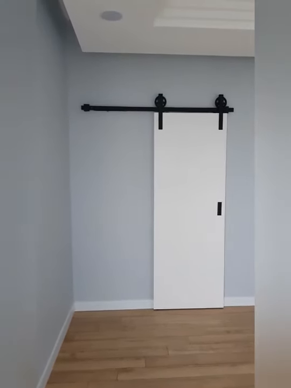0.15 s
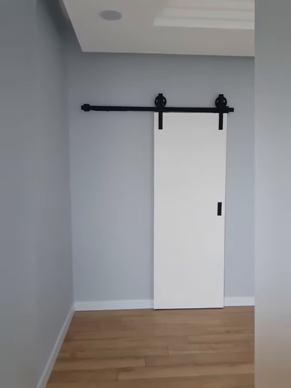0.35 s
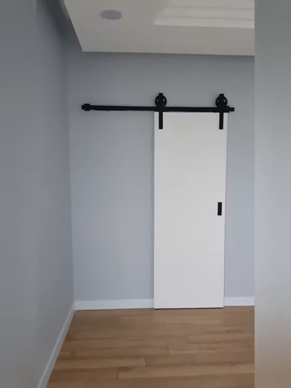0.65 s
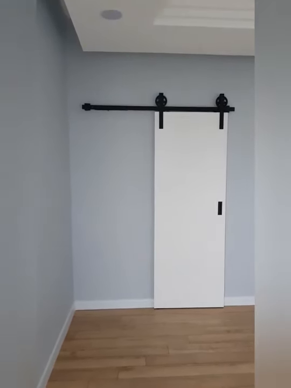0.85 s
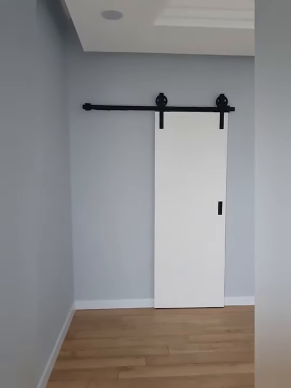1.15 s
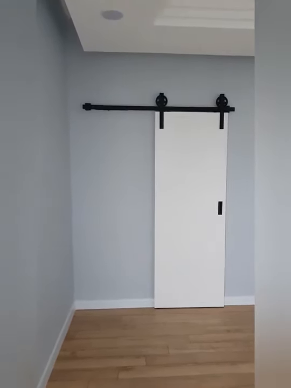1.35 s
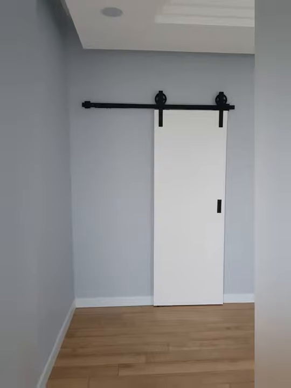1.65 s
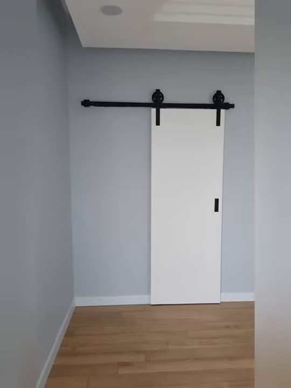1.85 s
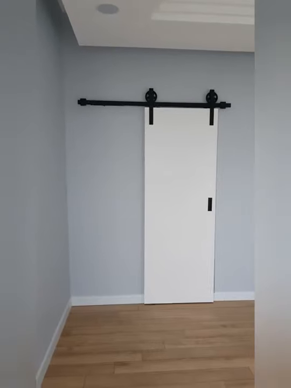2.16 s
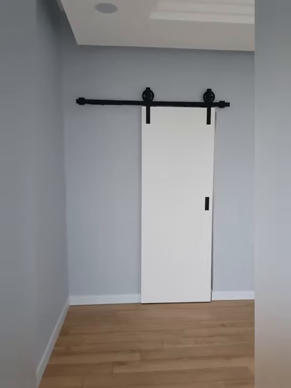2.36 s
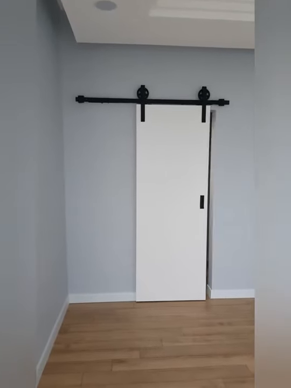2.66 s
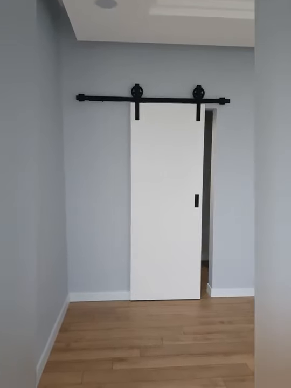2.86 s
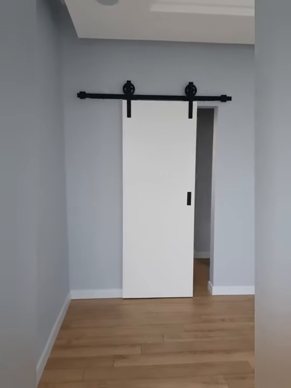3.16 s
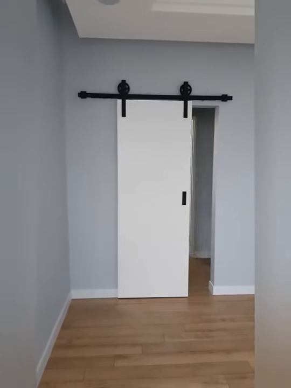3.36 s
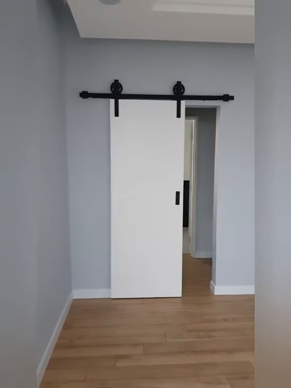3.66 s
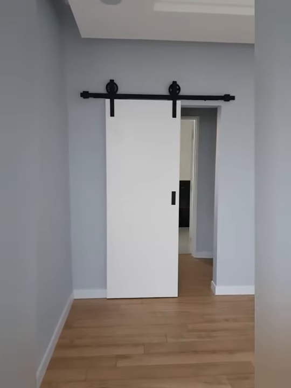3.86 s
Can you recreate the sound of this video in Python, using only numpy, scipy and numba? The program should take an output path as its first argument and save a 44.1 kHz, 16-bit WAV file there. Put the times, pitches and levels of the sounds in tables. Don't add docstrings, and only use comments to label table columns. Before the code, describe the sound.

A light sliding door rumbles along its overhead rail, starting with a heavy jolt in a bare room.

```python
import sys
import numpy as np
from scipy import signal
from scipy.fft import rfft, irfft
from scipy.io import wavfile
from scipy.ndimage import uniform_filter1d
from numba import njit

SR = 44100
rng = np.random.default_rng(int(sys.argv[2]) if len(sys.argv) > 2 else 0)


def volts_from_decibels(level):
    exponent = np.asarray(level, float) / 20
    return 10 ** exponent


def wav_record(signal):
    frames = np.transpose(np.atleast_2d(signal))
    bounded = np.clip(frames, -1, 1)
    quanta = np.round(bounded * 32767).astype(np.int16)
    wavfile.write(sys.argv[1], SR, quanta)


N = 176400
T = np.arange(N) / SR

# pitch_hz, width_hz, rolling_db, rest_db
MODES = [(51.2, 6.3, -2, 2), (74, 18, -8.5, -2), (90.9, 11.2, -0.5, -5.5), (131.7, 2.9, -8, -7.5),
         (150.7, 16.4, -1.5, -7.5), (176, 32, -12, -9), (219.7, 9.2, -3.5, -10.5), (255.3, 25.5, -10, -4.5),
         (291, 5, -16.5, -8), (319.4, 11, -15, -15.5), (367.4, 42, -12, -10), (405.2, 20, -22, -13.5),
         (492, 39, -14, -15), (743.8, 7.5, -37, -20)]
# time_s, load_db
ROLL_LOAD = [(1.7, -82.5), (1.725, -23), (1.78, -22.5), (1.85, -26), (1.92, -28), (2.05, -27.5),
             (2.25, -36), (2.42, -37), (2.49, -45), (2.53, -48), (2.63, -39), (2.72, -32.5), (2.97, -39),
             (3.08, -33), (3.17, -36.5), (3.3, -31), (3.85, -35), (4.0, -35.5)]
# start_s, level_db, softness_hz (lower is softer)
RAIL_JOLTS = [(0.039, -33.5, 120), (0.967, -34, 118.5), (1.72, -22.5, 600), (1.822, -24, 120),
              (1.847, -25.5, 121), (1.919, -23, 205), (1.958, -31, 122), (2.019, -27.5, 346),
              (2.09, -22, 197), (2.198, -33, 146), (2.32, -33, 198), (2.507, -30.5, 196.4),
              (2.77, -40, 150.8), (2.946, -33, 91), (3.059, -37, 256), (3.151, -30, 95), (3.341, -45, 247),
              (3.451, -52, 194), (3.782, -31, 78), (3.86, -41, 90)]
# start_s, length_s, peak_db, pitch_hz
CHATTERS = [(0.01, 0.077, -35, 52), (0.448, 0.18, -42, 50), (0.938, 0.13, -38.5, 47),
            (1.726, 0.19, -22.5, 52), (1.744, 0.07, -29.5, 148), (1.749, 0.071, -31, 211),
            (1.76, 0.12, -37, 316), (1.808, 0.073, -23.5, 137), (1.893, 0.061, -26.5, 128),
            (1.912, 0.077, -31, 61), (1.957, 0.13, -35.5, 223), (1.99, 0.11, -45, 367),
            (2.004, 0.057, -21.5, 146), (2.056, 0.13, -29, 73), (2.066, 0.12, -26.5, 133),
            (2.167, 0.08, -27.5, 77), (2.188, 0.058, -29, 139), (2.215, 0.1, -27, 51),
            (2.282, 0.19, -34.5, 139), (2.31, 0.1, -34, 68), (2.71, 0.14, -48, 220), (2.735, 0.2, -35, 55),
            (2.836, 0.11, -39.5, 144), (2.914, 0.086, -29.5, 53), (2.97, 0.12, -34.5, 226),
            (3.044, 0.071, -33.5, 88), (3.103, 0.11, -39, 145), (3.127, 0.086, -31.5, 51),
            (3.158, 0.05, -45, 372), (3.17, 0.16, -37, 222), (3.327, 0.075, -32, 142),
            (3.38, 0.22, -39, 139), (3.456, 0.072, -39, 58), (3.48, 0.15, -40.5, 247),
            (3.613, 0.22, -37, 141), (3.74, 0.23, -31.5, 50), (3.88, 0.092, -38.5, 143)]
# start_s, length_s, level_db, centre_hz, brightness_db
SLIDES = [(0.224, 0.32, -74, 2500, 5), (0.84, 0.075, -76, 4000, 3), (1.22, 0.11, -52, 855, -18),
          (1.298, 0.093, -53, 2000, -14), (1.225, 0.19, -50.5, 1550, -11), (1.522, 0.12, -52, 1130, -6.5),
          (1.66, 0.11, -48, 724, -8.5), (1.84, 0.31, -56.5, 1230, -6.5), (2.294, 0.62, -76, 2820, 4.5),
          (2.18, 0.47, -67, 1260, -5), (2.57, .08, -60, 1470, -2.5), (2.8, 0.27, -56.5, 1370, -6),
          (3.178, 0.06, -73.5, 2500, 6), (3.245, 0.044, -79, 4000, 6), (3.414, 0.045, -51, 640, -14),
          (3.56, 0.063, -55, 1215, -12), (3.646, 0.11, -46, 950, -6.5), (3.797, 0.3, -53, 1220, -5)]
# start_s, length_s, level_db, centre_hz, brightness_db
SKIDS = [
    (0.988, 0.095, -59, 2400, 4),
    (2.641, 0.05, -47.5, 1790, -7.5),
    (3.363, 0.11, -42, 810, -9.5),
]
# start_s, length_s, level_db
FABRIC_BRUSHES = [(1.0, 0.095, -69.5), (1.27, 0.15, -66.5), (0.876, .1, -80), (1.74, 0.33, -75),
                  (2.082, 0.42, -80.5), (2.552, .08, -77), (2.642, 0.094, -67.5), (2.86, .2, -72.5),
                  (3.37, 0.16, -71.5), (3.75, 0.13, -69.5)]
# freq_hz, density_db (per Hz)
FABRIC_TONE = [(6500, 0), (8500, -7.5), (10800, -3.5), (13000, -9), (15500, -9.5)]
# freq_hz, density_db (per Hz)
SCUFF_EDGE = [(1500, 1.5), (2800, 4.5), (4200, 1), (6800, -8), (8400, -22), (15500, -25)]
# pitch_hz, width_hz, level_db
FLOORBOARDS = [(612, 130, -7), (715, 22, 3), (897, 33, -6.5), (1260, 49, -4), (1717, 28, -11),
               (1990, 22, -10.5), (2480, 34, -11)]
# freq_hz, density_db (per Hz)
HISS_TONE = [(330, -12.5), (800, -3.5), (2300, -16.5), (3300, -31.5), (6800, -34.5), (8300, -48.5),
             (12000, -35.5), (15700, -38)]
# freq_hz, side_minus_mid_db
STEREO_WIDTH = [(30, -48), (60, -18), (125, -17), (250, -16), (420, -5.5), (650, -3), (1000, 1),
                (2000, 0.5)]
# freq_hz, left_minus_right_db
STEREO_LEAN = [(125, 0), (250, -2), (500, 0), (1000, -3), (3000, -3.5), (6000, -3), (9000, .5)]
# freq_hz, gain_db
MIC_PORT = [(2700, -0.5), (3400, -3.5), (4300, -0.5), (7200, -0.5), (8300, -1.5), (9800, 1)]

BUMPS_PER_S, BUMP_SCATTER_DB = 270, 1.5
DULL_PER_DB = 0.0636
CONTACT_HZ = 440
CHATTER_WOBBLE, CHATTER_DB = 0.0203, -1
SCUFF_ATTACK_S, ATTACK_SHARE, SCUFF_RELEASE_S = 0.041, 0.46, 0.15
SKID_ATTACK_S = 0.048
GRIT_PER_S, GRIT_SCATTER_DB = 3000, 2
SQUEAK_S, SQUEAK_LEN_S, SQUEAK_DB = 2.945, 0.086, -70
SQUEAK_HZ, SQUEAK_RISE_HZ, SQUEAK_WIDTH_HZ = 10750, 600, 1300
TICK_S, TICK_DB, TICK_HZ = 3.246, -58, 5500
HUM_DB, HISS_DB = -41.5, -54
ROOM_T60_S, ROOM_DB = 0.53, -5.5
BASS_T60_S, BASS_SIDE_T60_S, BASS_WET_DB = 0.73, 0.26, -10.5


def level(x, db):
    return x * volts_from_decibels(db) / np.sqrt(np.mean(x ** 2))


def colour(x, table):
    hz, db = np.array(table, float).T
    freq = np.fft.rfftfreq(x.shape[-1], 1 / SR)
    gain = volts_from_decibels(np.interp(np.log(freq + 1), np.log(hz), db))
    return irfft(rfft(x) * gain, x.shape[-1])


@njit
def gliding_band(x, hz, width):
    y, b, l = np.empty(len(x)), 0., 0.
    for i in range(len(x)):
        g, k = np.tan(np.pi * hz[i] / SR), width / hz[i]
        v = (b + g * (x[i] - l)) / (1 + g * (g + k))
        b, l, y[i] = 2 * v - b, l + 2 * g * v, k * v
    return y


def band(x, hz, width):
    return signal.lfilter(*signal.iirpeak(hz, hz / width, SR), x)


def low_pass(x, hz):
    return signal.sosfilt(signal.butter(2, hz, fs=SR, output="sos"), x)


def walk(rate):
    hold = int(SR / rate)
    steps = np.repeat(rng.standard_normal(N // hold + 1), hold)
    return 1.36 * uniform_filter1d(uniform_filter1d(steps, hold), hold)[:N]


def clicks(rate, scatter_db):
    struck = rng.random(N) < rate / SR
    size = rng.choice([-1, 1], N) * volts_from_decibels(scatter_db * rng.standard_normal(N))
    return level(struck * size, 0)


def swell(start, length, attack, release):
    rise = np.clip((T - start) / attack, 0, 1) ** 0.72
    return rise * np.exp(-np.maximum(T - start - length, 0) / release)


def door():
    load_db = np.interp(T, *np.array(ROLL_LOAD).T)
    wheels = [clicks(BUMPS_PER_S, BUMP_SCATTER_DB) for _ in range(4)]
    jolts = 0
    for start, db, hz in RAIL_JOLTS:
        phase = np.clip((T - start) * hz, 0, 1)
        jolts = jolts + volts_from_decibels(db - 18) * hz / 100 * np.sin(np.pi * phase) ** 2
    out = 0
    for k, (hz, width, rolling_db, _) in enumerate(MODES):
        def ring(x):
            return band(band(x, hz, width), hz, 3.5 * width)
        bumps = wheels[k % 4]
        tilt_db = DULL_PER_DB * (load_db + 36) * np.log2(hz / 150)
        push = bumps * volts_from_decibels(load_db - 4 + tilt_db)
        rung = ring(push) + (-1) ** k * ring(jolts)
        out = out + volts_from_decibels(rolling_db - 5) * rung / np.std(ring(bumps))
    return low_pass(out, CONTACT_HZ)


def shudders():
    drift = np.cumsum(1 + CHATTER_WOBBLE * walk(20)) / SR
    out = 0
    for start, length, db, hz in CHATTERS:
        phase = np.clip((T - start) / length, 0, 1)
        tone = np.sin(2 * np.pi * (hz * drift + rng.random()))
        out = out + volts_from_decibels(db + CHATTER_DB) * np.sin(np.pi * phase) ** 0.57 * tone
    return out


def grit():
    return clicks(GRIT_PER_S, GRIT_SCATTER_DB) + rng.standard_normal(N)


def scuffs(drag):
    body = colour(grit(), [(2400, -8.0), (3400, -16.5), (8000, -32.5)])
    body = body + sum(volts_from_decibels(db) * band(body, hz, width) for hz, width, db in FLOORBOARDS)
    edge = level(colour(grit(), SCUFF_EDGE), 0)
    fabric = level(colour(grit(), [(4000, -37.0)] + FABRIC_TONE), 0)
    out = 0
    for start, length, db in FABRIC_BRUSHES:
        out = out + volts_from_decibels(db) * swell(start, length, 0.026, 0.057) * fabric
    steps = [(SCUFF_ATTACK_S + ATTACK_SHARE * row[1], row) for row in SLIDES]
    steps += [(SKID_ATTACK_S, row) for row in SKIDS]
    for attack, (start, length, db, hz, bright_db) in steps:
        tone = level(band(band(body, hz, hz), hz, 5.1 * hz), 0) + volts_from_decibels(bright_db) * edge
        out = out + volts_from_decibels(db) * swell(start, length, attack, SCUFF_RELEASE_S) * tone
    return out * drag


def wheel():
    hz = SQUEAK_HZ + SQUEAK_RISE_HZ * np.clip((T - SQUEAK_S) / SQUEAK_LEN_S, 0, 1)
    rub = rng.standard_normal(N)
    for _ in range(2):
        rub = gliding_band(rub, hz, float(SQUEAK_WIDTH_HZ))
    squeak = level(rub, SQUEAK_DB) * swell(SQUEAK_S, SQUEAK_LEN_S, 0.02, 0.0093)
    knock = band(band(rng.standard_normal(N), TICK_HZ, 3800), TICK_HZ, 3000)
    return squeak + level(knock, TICK_DB) * swell(TICK_S, 0.0011, 0.0006, 0.0017)


def house():
    hum = 0
    for hz, width, _, rest_db in MODES:
        tone = level(band(rng.standard_normal(N), hz, 1.02 * width), 0)
        hum = hum + volts_from_decibels(rest_db + 0.5 * walk(3.66)) * tone
    hum = low_pass(level(hum, HUM_DB), 700)[::-1]
    hiss = colour(colour(rng.standard_normal(N), HISS_TONE), [(200, -27), (330, 14)])
    return hum + level(hiss, HISS_DB) * volts_from_decibels(0.5 * walk(3.86))


def echo(x, t60):
    decay = np.exp(-np.log(1000) * T[:SR] / t60)
    tail = level(rng.standard_normal(SR) * decay, 0) / np.sqrt(SR)
    return signal.fftconvolve(x, tail)[:N]


def surroundings(drag):
    near = scuffs(drag)
    return near + volts_from_decibels(ROOM_DB) * echo(near, ROOM_T60_S) + house() + wheel()


def scene():
    low = door() + shudders()
    drag = volts_from_decibels(walk(24.94))
    mid = low + volts_from_decibels(BASS_WET_DB) * echo(low, BASS_T60_S) + surroundings(drag)
    side = colour(echo(low, BASS_SIDE_T60_S) + surroundings(drag), STEREO_WIDTH)
    channels = []
    for sign in (1, -1):
        lean = [(hz, sign * db / 2) for hz, db in STEREO_LEAN]
        channels.append(colour(mid + sign * side, lean))
    return np.array(channels)


def top_cut(x):
    return signal.sosfilt(signal.butter(12, 16230, fs=SR, output="sos"), x)


def record(dry):
    high_pass = signal.butter(3, 34, "high", fs=SR, output="sos")
    cut = signal.sosfilt(high_pass, colour(dry, MIC_PORT))
    mix = np.array([colour(channel, [(15700, 0), (15760, -80)]) for channel in cut])
    return top_cut(mix)


dry = scene()
out = record(dry)
wav_record(out)
```